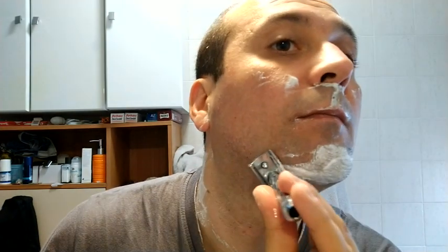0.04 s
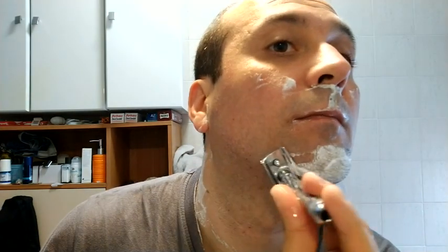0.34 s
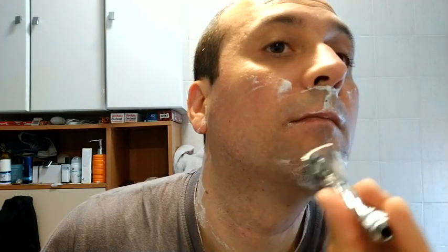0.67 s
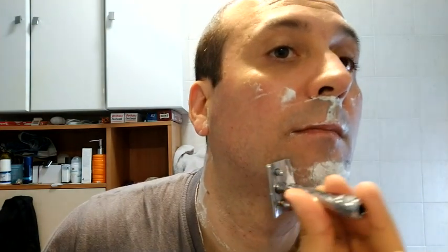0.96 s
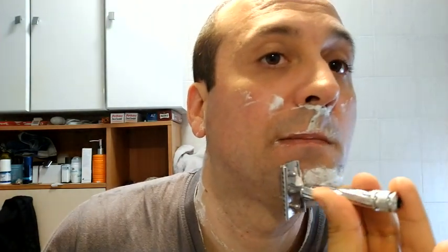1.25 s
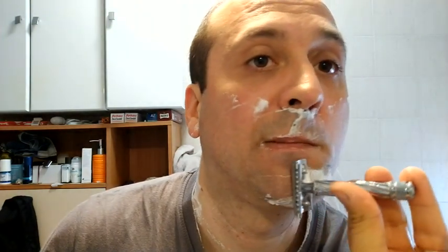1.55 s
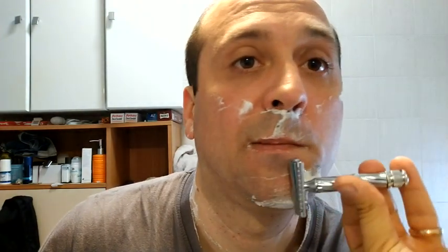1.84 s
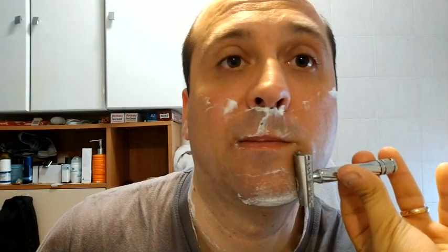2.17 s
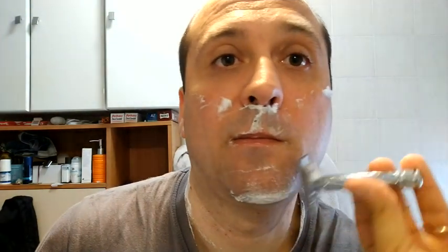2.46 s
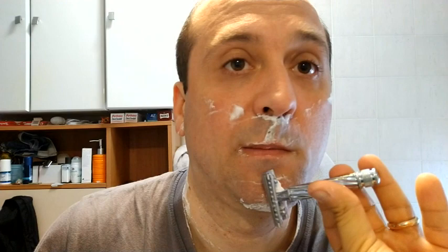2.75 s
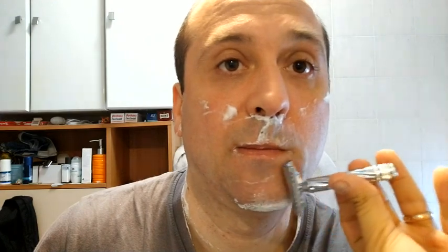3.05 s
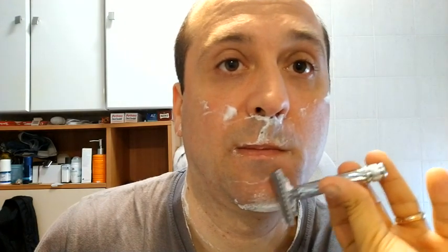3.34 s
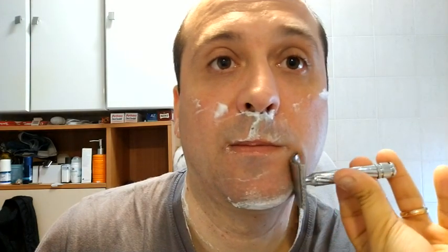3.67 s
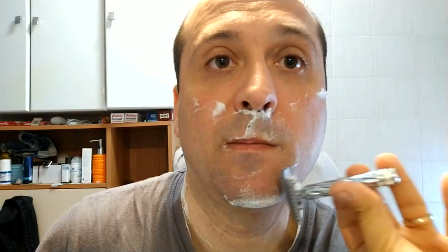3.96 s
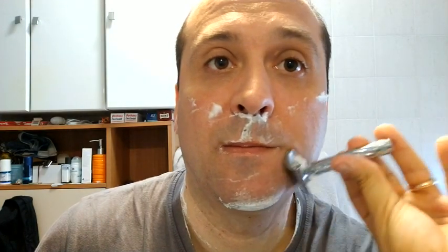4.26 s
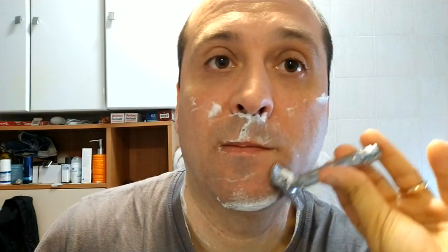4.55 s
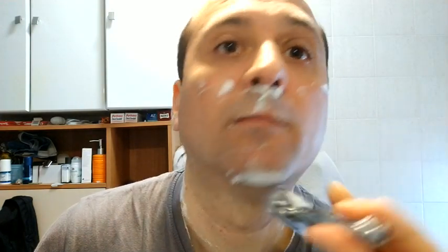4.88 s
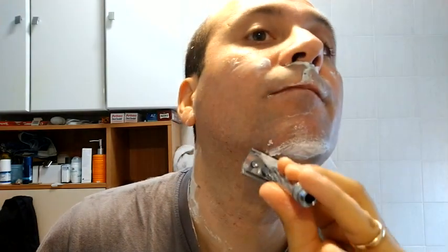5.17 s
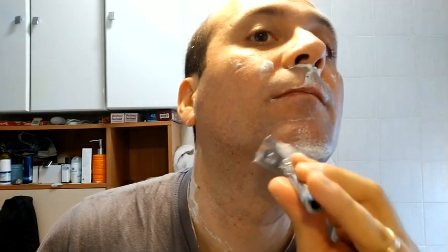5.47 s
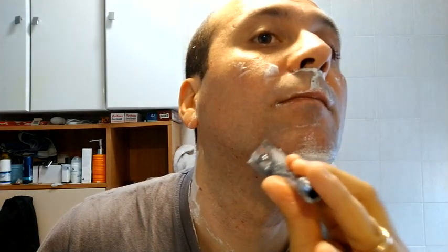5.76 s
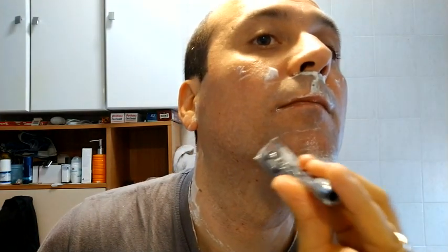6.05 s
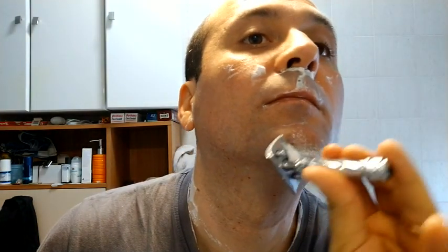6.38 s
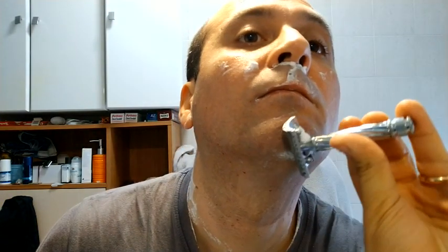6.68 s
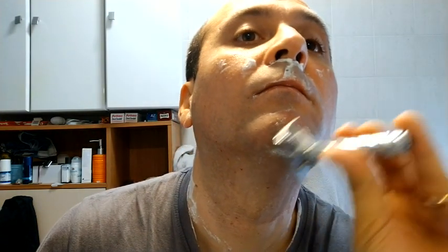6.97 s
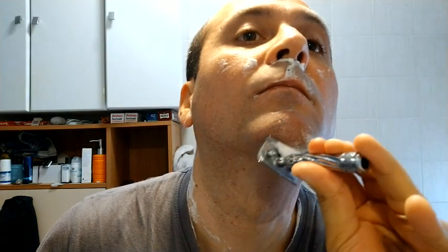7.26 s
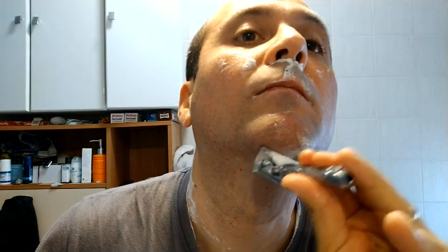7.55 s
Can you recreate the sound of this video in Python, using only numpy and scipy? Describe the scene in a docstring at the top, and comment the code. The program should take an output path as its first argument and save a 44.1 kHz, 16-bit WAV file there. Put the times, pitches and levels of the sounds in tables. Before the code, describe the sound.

A safety razor scrapes through stubble in short, crisp, scratchy strokes in a small bathroom with a faint hum.

```python
"""A metal safety razor is drawn through stubble in short strokes in a small tiled bathroom.
In each stroke the blade lands, bites, is pulled with rising or easing pressure and lifts off.
It snaps hairs in quick clumps over a soft rasp of skin, and now and then snags on a stiff one.
Near walls throw the crackle back; a low room hum and a faint microphone hiss lie underneath."""
import sys
import numpy as np
from scipy import signal
from scipy.fft import rfft, irfft
from scipy.io import wavfile
from scipy.ndimage import uniform_filter1d

SR = 44100
rng = np.random.default_rng(int(sys.argv[2]) if len(sys.argv) > 2 else 0)


def transcribe(u):
    """Save the signal u as a 16-bit wav file named by the first command-line argument.

    u: samples, shape (n,) or (channels, n), limited to [-1, 1]; the rate is SR.
    q: integer samples, one column per channel.
    """
    v = np.clip(np.atleast_2d(u).T, -1, 1)
    q = np.round(v * 32767).astype(np.int16)
    wavfile.write(sys.argv[1], SR, q)


N = 344862
TIME = np.arange(N) / SR
FREQS_HZ = np.fft.rfftfreq(N, 1 / SR)
TOP_HZ, BACKGROUND_TOP_HZ = 15800, 12100  # treble limits: whole sound; hiss and late echo


def gain_of(db):
    """Turns decibels into a number to multiply a sound by."""
    return 10 ** (np.asarray(db) / 20)


def unit_level(x):
    """Scales each channel to an average power of 1."""
    return x / np.sqrt(np.mean(x ** 2, axis=-1, keepdims=True) + 1e-20)


def curve_at(points, hz, column=1):
    """Reads between the rows of a frequency table, giving each octave equal room."""
    table = np.transpose(points)
    return np.interp(np.log(hz + 1), np.log(table[0] + 1), table[column])


def convolve(x, taps):
    """Filters every channel and keeps the scene's length."""
    return signal.oaconvolve(np.atleast_2d(x), np.atleast_2d(taps), axes=1)[:, :N]


def low_pass(x, edge_hz):
    """Cuts off the treble above edge_hz."""
    taps = signal.firwin(511, edge_hz, window=("kaiser", 9), fs=SR)
    return signal.oaconvolve(x, taps[None], "same")


def room_tone(air_db=-56, rumble_below_hz=260):
    """The still room: a slowly swelling rumble, a wavering hum, a thin whine and microphone hiss."""
    # Tone of the rumble and hiss. Each row: frequency in Hz, relative level in dB.
    air_tone = [(20, -16), (45, -6), (68, -8), (98, 0), (135, -2.5), (260, -4), (400, -10), (510, -9.5),
                (620, -15), (1500, -19), (4000, -22), (8000, -23.5), (11500, -20.5), (12000, -24)]
    # How alike left and right are. Each row: frequency in Hz, likeness from 0 to 1.
    air_likeness = [(25, 0.036), (100, 0.84), (250, 0.39), (600, 0.15), (1500, 0), (10000, 0.026)]
    # Room hum and electronic whine. Each row: pitch in Hz, width in Hz, level in dB before the swell.
    hums = [(90.5, 12, -76), (109.1, 10, -70.5), (276, 4, -73), (334.4, 5, -72.5), (495.3, 12, -76),
            (6120, 120, -81), (11600, 230, -77)]
    # The rumble's swell. Each row: time in seconds, level in dB (only its rise and fall count).
    swell = [(0.0, -62.5), (2.6, -60.5), (4.5, -60), (4.68, -55), (4.92, -59), (5.7, -60), (6.7, -59.5),
             (7.82, -61)]
    left, other = rfft(rng.standard_normal((2, N)))
    alike = curve_at(air_likeness, FREQS_HZ)
    noise = np.array([left, alike * left + np.sqrt(1 - alike ** 2) * other])
    air = irfft(noise * gain_of(curve_at(air_tone, FREQS_HZ)), N)
    out = gain_of(air_db) * unit_level(air)
    for pitch_hz, width_hz, db in hums:  # a narrow band of noise sounds like a wavering tone
        hum = irfft(1j * noise / (1 + (2 * (FREQS_HZ - pitch_hz) / width_hz) ** 2), N)
        out += gain_of(db) * unit_level(hum)
    swell_db = np.interp(TIME, *np.transpose(swell))
    rumble = irfft(rfft(out) / (1 + (FREQS_HZ / rumble_below_hz) ** 4), N)
    out += rumble * (gain_of(swell_db - swell_db.mean()) - 1)
    return low_pass(out, BACKGROUND_TOP_HZ)


def far_walls(x, level_db=-15.5, fade_s=0.21):
    """The faint late echo of the whole room; the highest treble does not carry."""
    t = TIME[:SR // 2]
    tail = rng.standard_normal((2, len(t))) * gain_of(-60 * t / fade_s) * (t > .01)
    tail /= np.linalg.norm(tail, axis=1, keepdims=True)
    return gain_of(level_db) * low_pass(convolve(x, tail), BACKGROUND_TOP_HZ)


def near_walls(tail_db=2.5, fade_s=0.055, left_lag_s=.00017, delay_spread=.04):
    """How a click arrives from one spot: directly, off the nearest surfaces, then off many tiles."""
    # Nearest surfaces. Each row: delay in seconds, left and right level in dB against the direct sound.
    echoes = [(.0018, 3, -30), (.00205, -7, -12), (.00235, -14, -9), (.0079, -30, -14)]
    t = TIME[:SR // 7]
    tail = rng.standard_normal((2, len(t))) * (rng.random((2, len(t))) < 6000 / SR)
    tail *= gain_of(-60 * t / fade_s) * (t > .0006)
    paths = gain_of(tail_db) * tail / np.linalg.norm(tail, axis=1, keepdims=True)
    paths[1, 0] += 1  # the direct sound reaches the right side first
    paths[0, round(left_lag_s * SR * (1 + delay_spread * rng.uniform(-1, 1)))] += 1
    for delay_s, left_db, right_db in echoes:
        at = np.round(delay_s * SR * (1 + delay_spread * rng.uniform(-1, 1, 2))).astype(int)
        paths[[0, 1], at] += gain_of([left_db, right_db]) * rng.choice([-1, 1], 2)
    return paths


def click_with_tone(tone, column, pitch_ratio, size=2048):
    """A short click with the tone given in a table, moved up or down by pitch_ratio."""
    hz = np.fft.rfftfreq(size, 1 / SR) / pitch_ratio
    cepstrum = irfft(np.log(gain_of(curve_at(tone, hz, column))))
    # Folding the second half onto the first keeps the tone and packs the energy at the click's start.
    cepstrum[1:size // 2] *= 2
    cepstrum[size // 2 + 1:] = 0
    return irfft(np.exp(rfft(cepstrum)))


def from_moving_hand(x, tone, step_s, pitch_drift=0.):
    """Gives a sound its tone and near echoes, fading to a new spot every step_s as the hand moves."""
    out, hop = np.zeros((2, N)), round(step_s * SR)
    for centre in range(0, N + hop, hop):
        at = np.arange(max(centre - hop, 0), min(centre + hop, N))
        piece = x[at] * np.cos(np.pi / 2 * (at - centre) / hop)
        pitch_ratio = np.exp(pitch_drift * rng.uniform(-1, 1))
        clicks = [click_with_tone(tone, column, pitch_ratio) for column in range(1, len(tone[0]))]
        response = signal.fftconvolve(np.array(clicks), near_walls(), axes=1)
        response /= np.linalg.norm(response, axis=1, keepdims=True)
        if len(at):
            sound = signal.fftconvolve(piece[None], response, axes=1)
            part = out[:, at[0]:at[0] + sound.shape[1]]
            part += sound[:, :part.shape[1]]
    return out


def hand_strokes(ordinary_db=-44.5, ordinary_bite_s=0.0095, lift_fall_db=21.5, rasp_follow=0.69):
    """The blade bites, is pulled and lifts off; gives the five curves that steer the razor's sound."""
    # Each row: start, pull length and lift-off length in seconds; crackle at the start and end of the
    # pull, rasp offset, lean to the left and ring of the razor's head in dB; coarseness from 0 to 1.
    # razor() raises both levels a little and uses only part of the lean.
    strokes = [ (-0.02, 0.18, 0.25, -56.5, -55.5, -12.5, 6, 3, 0.98),
               (0.24, 0.12, 0.15, -55, -47.5, -12.5, 4, 2, .8),
               (0.419, 0.11, 0.2, -62.5, -39.5, -9.5, -2, 3, 0.37),
               (0.973, 0.078, 0.11, -50.5, -49.5, -15.5, 8, -0.5, 1),
               (1.099, 0.14, 0.22, -49.5, -44.5, -13.5, 9, 0, 1),
               (1.27, 0.17, 0.13, -50.5, -45, -16, 7, -2, 1),
               (1.441, 0.17, 0.13, -46.5, -37.3, -15, 14, -1, 1),
               (1.803, 0.14, 0.25, -47, -39, -14, 12, -0.5, 0.8),
               (2.04, 0.3, .11, -54.5, -42, -14, 5, 0, 0.56),
               (2.356, 0.065, 0.061, -61.5, -47.5, -15, -1, 3, 0.5),
               (2.795, 0.096, 0.063, -53.5, -53, -15, 10, 1, 1),
               (2.95, 0.16, 0.125, -44, -46, -18, 8, 1, 0.6),
               (3.405, 0.043, 0.11, -58, -41.3, -20.5, 11, 2, .7),
               (3.5, 0.13, 0.31, -58, -58.5, -10.5, -7, 3.5, 0.33),
               (3.74, 0.084, 0.093, -63, -56, -14.5, -3, -0.5, .4),
               (4.17, 0.16, 0.097, -67, -57.5, -9.5, -4, 0, 0.45),
               (4.597, 0.12, 0.15, -58.5, -60.5, -13.5, -7, 0.5, 0.5),
               (5.372, 0.16, 0.082, -65.5, -41.5, -12, 8, -1.5, 0.62),
               (5.771, 0.086, .12, -55, -43.8, -12.5, 12, -.5, 0.1),
               (6.056, 0.11, 0.083, -57.5, -46.5, -13, 7, 0, .35),
               (6.28, 0.019, 0.073, -52.5, -59.5, -15, -1, -2, 0.4),
               (6.392, 0.08, 0.19, -58.5, -44.5, -11.5, 12, 1.5, 0.75),
               (6.5, 0.063, 0.091, -49, -41.5, -17.5, 17, -2.5, 0.85),
               (6.6, 0.16, 0.38, -42.5, -45, -16.5, 13, -3.5, 0.98),
               (6.804, 0.04, 0.13, -38.5, -43, -16.5, 14, -3.5, 0.67),
               (6.881, 0.07, 0.072, -44.5, -41, -15.5, 6, -1, 0.9),
               (7.235, 0.17, 0.08, -59.5, -39.5, -11.5, 6, 1.5, 0.44),
               (7.645, 0.11, 0.43, -61.5, -41, -13.5, 2, 1, 0.42), ]
    crackle_power, rasp_power = np.zeros((2, N))
    blend = np.zeros((3, N))
    for start, pull_s, lift_s, first_db, last_db, skin_db, left_db, head_db, coarse in strokes:
        on = (TIME > start) & (TIME < start + pull_s + lift_s)
        t = TIME[on] - start
        bite_s = ordinary_bite_s * 2 ** ((ordinary_db - first_db) / 17)  # a light touch bites slowly
        pull = np.minimum(t / pull_s, 1) ** 0.92
        lift = np.clip((t - pull_s) / lift_s, 0, 1) ** 1.09
        contact = np.minimum(t / bite_s, 1) * (1 - lift ** 2)
        level_db = first_db + (last_db - first_db) * pull - lift_fall_db * lift
        power = (contact * gain_of(level_db)) ** 2
        crackle_power[on] += power
        # The rasp follows pressure less than the crackle does.
        rasp_db = ordinary_db + rasp_follow * (level_db - ordinary_db) + skin_db
        rasp_power[on] += (contact * gain_of(rasp_db)) ** 2
        blend[:, on] += np.outer([left_db, head_db, coarse], power)
    lean_db, ring_db, coarseness = blend / (crackle_power + 1e-20)  # the louder stroke counts more
    return np.sqrt(crackle_power), np.sqrt(rasp_power), lean_db, ring_db, coarseness


def blade_slips(rate_hz=85, width_hz=52):
    """The blade slips in an uneven flutter around rate_hz."""
    noise = rfft(rng.standard_normal(N))
    return unit_level(irfft(noise / (1 + ((FREQS_HZ - rate_hz) / width_hz) ** 2), N))


def steady_pace(x, window_samples=1700):
    """Slips bunch the cuts, but the hand keeps its pace: the level evens out over a few slips."""
    power = uniform_filter1d(uniform_filter1d(x ** 2, window_samples), window_samples)
    return x / np.sqrt(power + 1e-3)


def head_ring(x, ring_db, pitch_hz=8200, width_hz=2600):
    """The razor's head rings more or less, with the angle and the grip."""
    band = irfft(rfft(x) / (1 + (2 * (FREQS_HZ - pitch_hz) / width_hz) ** 4), N)
    return x + band * (gain_of(ring_db) - 1)


def snags(rise_s=0.0011, trim_db=-7):
    """The blade catches: a few hairs give way together in a crack a few milliseconds long."""
    # The blade lands or meets a stiff hair. Each row: time of the peak in seconds, relative level in dB.
    catches = [(0.02, -36), (0.176, -36.5), (0.262, -36), (0.4205, -38), (0.494, -29), (0.9622, -37),
               (0.993, -35), (1.046, -32), (1.056, -34), (1.116, -28.5), (1.1917, -30), (1.2, -29),
               (1.3624, -31), (1.449, -27), (1.605, -30), (1.7624, -41), (1.7754, -33.5), (1.8062, -30.5),
               (1.8642, -24), (2.160, -29), (2.287, -34.5), (2.3965, -29), (2.426, -29), (2.806, -31.5),
               (2.83, -33), (2.8554, -39), (2.9368, -26), (2.9743, -32), (3.0086, -29), (3.4176, -40),
               (4.1794, -42.5), (5.3921, -41.5), (5.548, -28), (5.7324, -47), (5.7833, -42), (6.108, -38),
               (6.4272, -33), (6.5153, -22.5), (6.578, -27), (6.655, -23.5), (6.7394, -31), (6.818, -28),
               (6.8597, -34), (6.9606, -20.5), (7.391, -28), (7.6106, -45)]
    out, t = np.zeros(N), TIME[:SR // 60]
    for peak_s, db in catches:
        crack = rng.standard_normal(len(t)) * t / rise_s * np.exp(1 - t / rise_s)
        part = out[round((peak_s - rise_s) * SR):][:len(t)]
        part += gain_of(db + trim_db) * crack[:len(part)]
    return out


def hair_snaps(per_s, spread_db=2.5, pitch_count=8, width_hz=2270):
    """Hairs snap at random, a few of them loudly; each rings very briefly at one of several pitches."""
    sizes = gain_of(spread_db * np.minimum(rng.exponential(1, N), 4)) * rng.choice([-1, 1], N)
    snaps = sizes * (rng.random(N) < per_s / SR) / np.sqrt(per_s)
    pitch_index = rng.integers(0, pitch_count, N)
    out, t = np.zeros(N), TIME[:SR // 300]
    for k, hz in enumerate(np.linspace(0, TOP_HZ, pitch_count)):
        click = np.exp(-np.pi * width_hz * t) * np.cos(2 * np.pi * hz * t)
        click[0] += .6  # the break itself is a broad tick
        out += convolve(snaps * (pitch_index == k), click)[0]
    return unit_level(out)


def razor(crackle_db=1.84, rasp_db=2.5, hairs_per_s=1700, clump_db=1.0, lean_share=0.36):
    """The blade cuts hair and drags on skin: coarse stubble goes in clumps, short in a dense rasp."""
    # Tone of the crackle as heard, with a sharp treble cut at 12 kHz: left drops, right goes silent.
    # Each row: frequency in Hz, left and right in dB (each side's shape only).
    crackle_tone = [(2000, -34, -32), (3200, -31, -29), (3900, -22, -19.5), (5700, -22, -19),
                    (6500, -19.5, -14.5), (7300, -12, -10), (8000, -10, -4.8), (8900, -9.5, -2.3),
                    (9700, -8, -5.5), (10500, -5, -9.5), (11300, -1.7, -8.5), (11650, 0.5, -9),
                    (11990, 5, -9.5), (12130, -13, -36), (12700, -14, -45), (13500, -10.5, -50),
                    (15800, -17, -50)]
    # Tone of the blade dragging on skin. Each row: frequency in Hz, relative level in dB.
    rasp_tone = [(300, -13), (1000, -11), (1600, -8.5), (2150, 1), (2700, 0), (3150, -1.5), (3700, 4.5),
                 (4400, 5.5), (4900, 5), (5700, 1), (6200, 2), (7500, 0), (11000, -25)]
    crackle_gain, rasp_gain, lean_db, ring_db, coarseness = hand_strokes()
    effort = np.clip(crackle_gain / gain_of(-46.5), .1, 4) ** .6  # harder strokes cut more hairs
    cuts = hair_snaps(hairs_per_s * 2.6 ** (1 - coarseness) * effort)
    clumps = gain_of(clump_db * coarseness * np.clip(blade_slips(), -2, 2))
    # The added noise is steel sliding on lather; it fills the gaps between snaps.
    crackle = steady_pace(clumps * (cuts + .22 * rng.standard_normal(N)))
    rasp = steady_pace(clumps * (cuts + .8 * rng.standard_normal(N)))
    blade = head_ring(gain_of(crackle_db) * crackle_gain * crackle + snags(), ring_db)
    blade = from_moving_hand(blade, crackle_tone, step_s=.16)
    blade *= gain_of(lean_share * np.array([lean_db, -lean_db]) / 2)
    # The rasp's tone wanders as the blade's angle and the skin's tension change.
    skin = from_moving_hand(gain_of(rasp_db) * rasp_gain * rasp, rasp_tone, step_s=.05, pitch_drift=.06)
    return blade + skin * gain_of([[0.1], [-0.1]])


def scene():
    """The razor and its echo over the still room."""
    shave = razor()
    return shave + far_walls(shave) + room_tone()


def record(dry):
    """Takes off the very highest treble."""
    return low_pass(dry, TOP_HZ)


dry = scene()
out = record(dry)
transcribe(out)
```